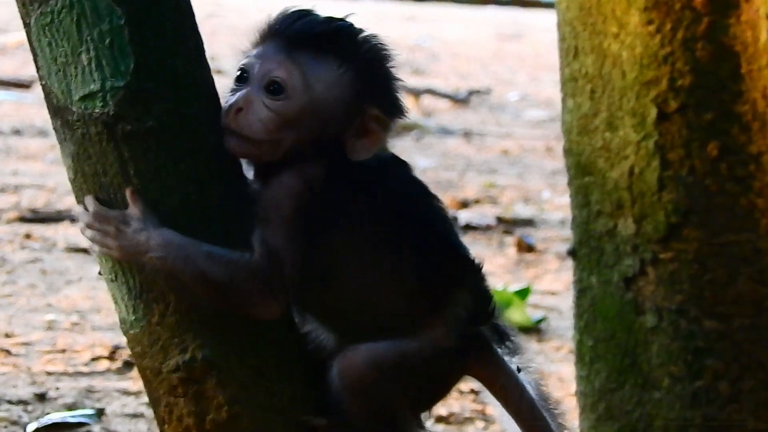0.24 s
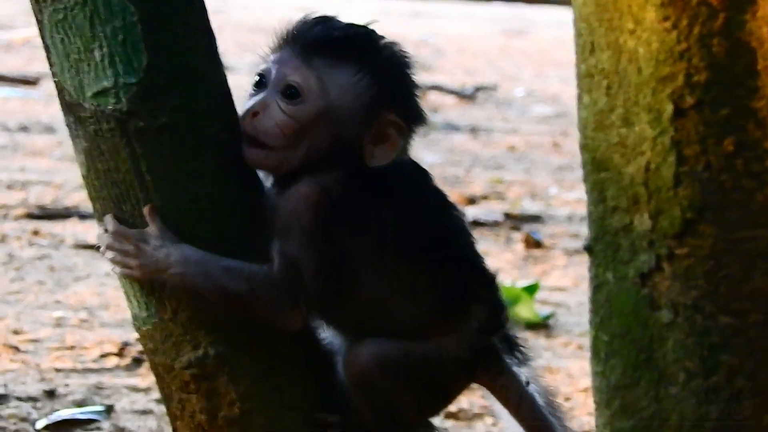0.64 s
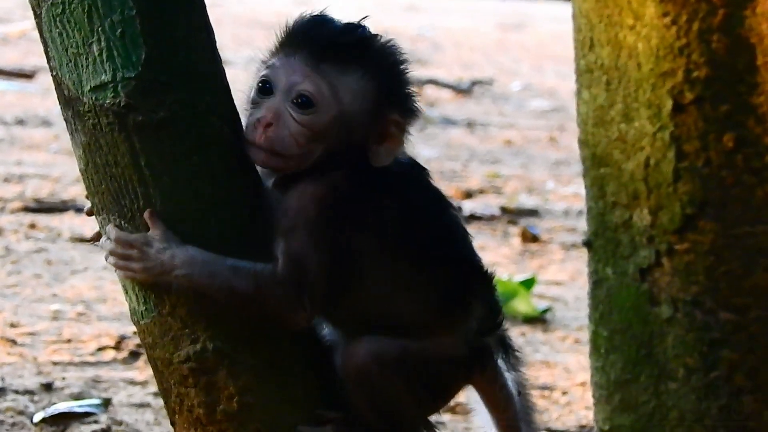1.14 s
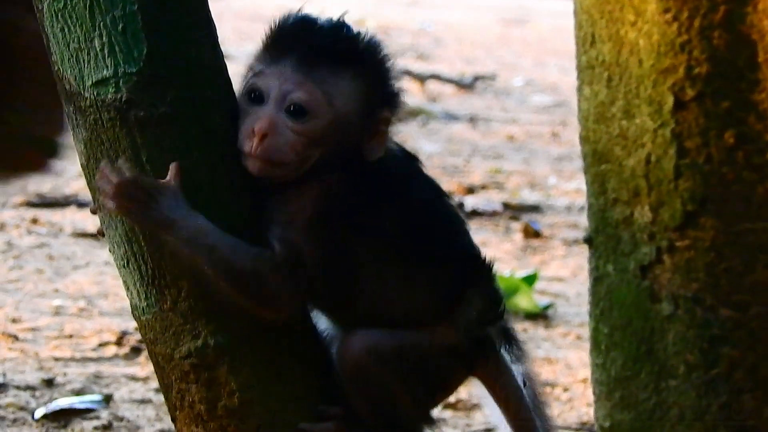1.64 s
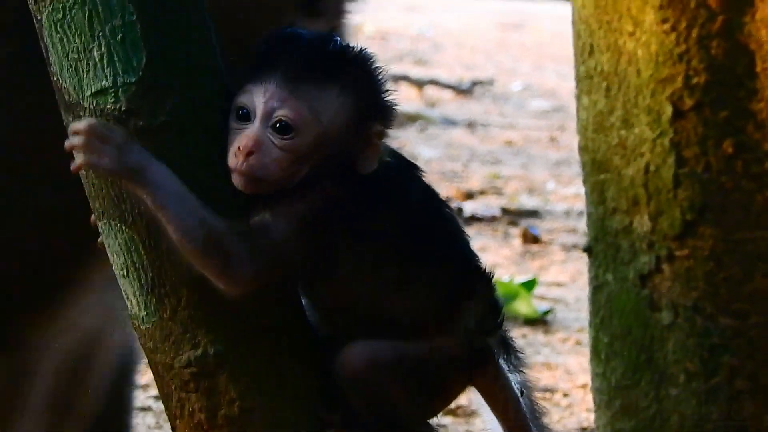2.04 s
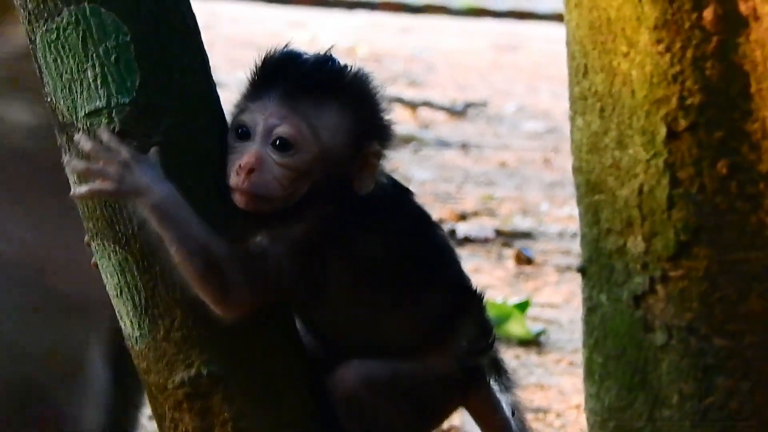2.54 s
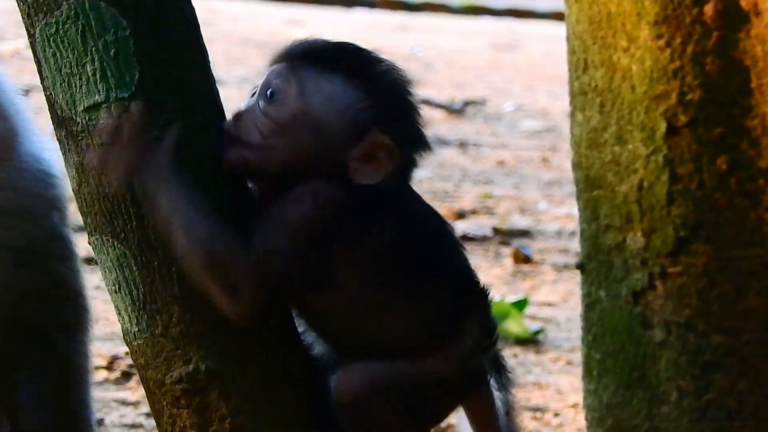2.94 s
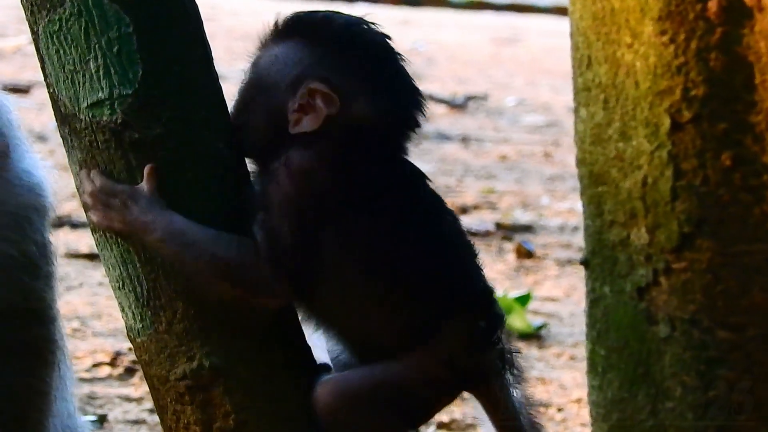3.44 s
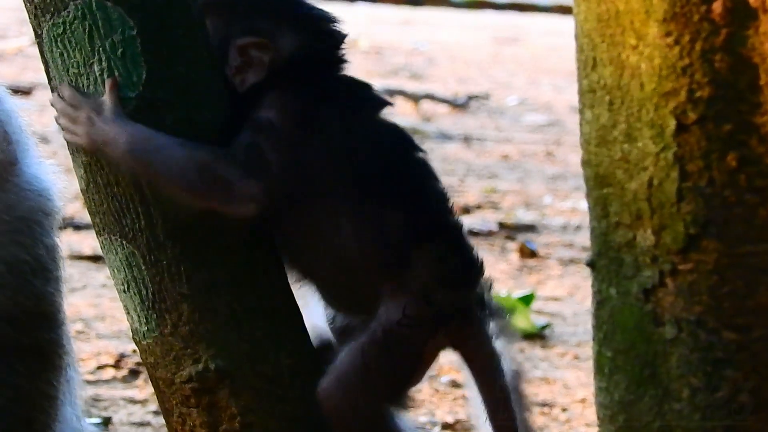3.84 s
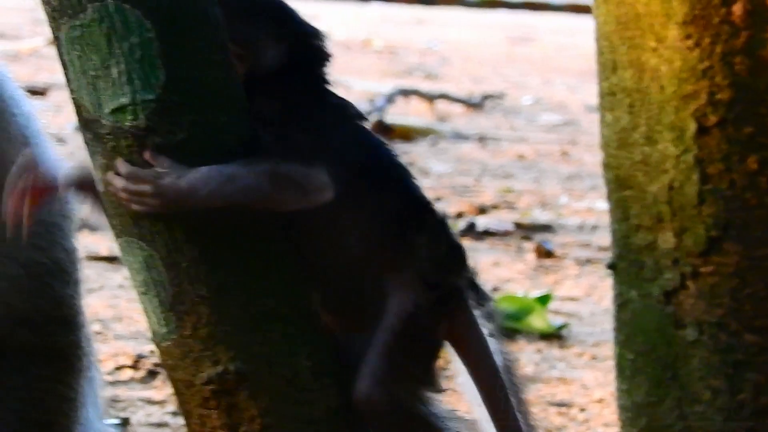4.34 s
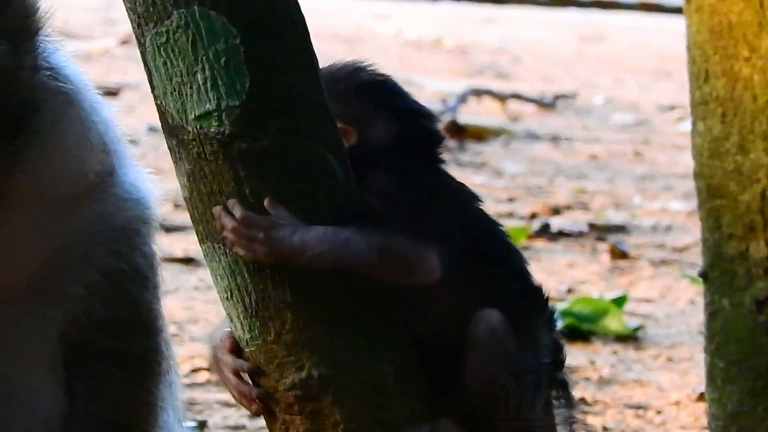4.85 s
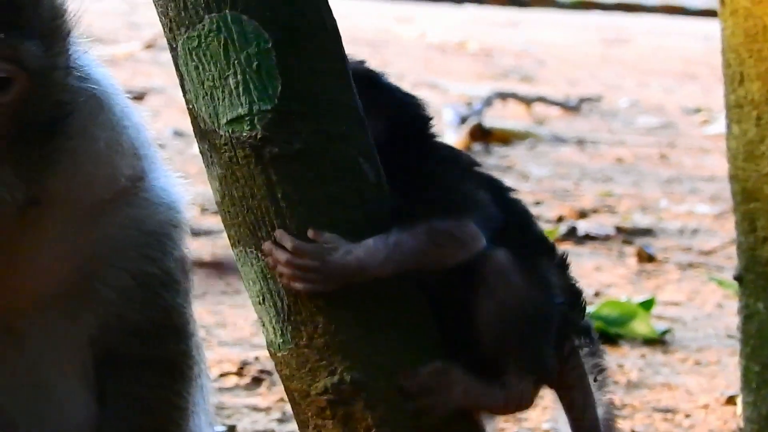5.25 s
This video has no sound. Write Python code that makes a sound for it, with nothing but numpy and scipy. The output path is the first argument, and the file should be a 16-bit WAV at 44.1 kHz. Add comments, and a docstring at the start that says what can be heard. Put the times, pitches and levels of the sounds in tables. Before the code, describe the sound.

A dense, shrill cicada chorus drones outdoors while nearer insects rasp in quick pulses, over faint engine rumble and small rustles and ticks on bark.

```python
"""Cicada chorus with near singers.

A chorus in the trees drones on: random clicks ring body resonances over a blurred noise mass of far singers.
Three near singers, a phrase each, rasp brightly some six times a second while the drone sinks.
Engines hum far away as wavering harmonics over a noise rumble; bark rustles in grains and ticks as
short wooden rings close by."""
import sys
import numpy as np
from scipy import signal
from scipy.fft import rfft, irfft
from scipy.io import wavfile

SR = 44100
rng = np.random.default_rng(int(sys.argv[2]) if len(sys.argv) > 2 else 0)


def waveform_to_disk(signal):
    """Save audio, clipped to [-1, 1], as 16-bit WAV at the path in sys.argv[1]."""
    frames = np.transpose(np.atleast_2d(signal))
    scaled = np.clip(frames, -1, 1) * 32767
    samples = np.round(scaled).astype(np.int16)
    wavfile.write(sys.argv[1], SR, samples)


def how_loud(loudness_db):
    """Turn decibels into a plain amplitude multiplier (0 dB gives 1, 20 dB gives 10)."""
    steps = np.asarray(loudness_db, float) / 20
    return 10 ** steps


N = 242550


def rms_one(x):
    """Scale to rms 1."""
    return x / np.sqrt(np.mean(x ** 2) + 1e-20)


def in_time(rows):
    """Columns of a curve at every sample."""
    s, *columns = np.transpose(rows)
    return [np.interp(np.arange(N) / SR, s, c) for c in columns]


def at_hz(points, hz):
    """Read a spectrum on a log-frequency axis."""
    point_hz, value = np.transpose(points)
    return np.interp(np.log(hz), np.log(point_hz), value)


def panned(db, pan_db):
    """Left and right gains, pan_db apart."""
    return how_loud(np.array([db + pan_db / 2, db - pan_db / 2]))


def drift(rate_hz):
    """Slow random curve of rms 1: noise through two equal low-pass poles at SR / 40."""
    r = np.exp(-80 * np.pi * rate_hz / SR)
    noise = rng.standard_normal(N // 40 + 2002)
    slow = signal.lfilter([1], [1, -2 * r, r * r], noise)[2000:]
    return np.interp(np.arange(N) / 40, np.arange(len(slow)), rms_one(slow))


def stereo(pair, alike):
    """Left and right of a given likeness from two unrelated signals."""
    alike = np.clip(alike, 0, 1)
    middle = np.sqrt((1 + alike) / 2) * pair[0]
    side = np.sqrt((1 - alike) / 2) * pair[1]
    return middle + side * [[1], [-1]]


def ring_twice(x, hz, width_hz):
    """A resonance applied twice keeps its skirts steep; width_hz is that of one pass."""
    r = np.exp(-np.pi * width_hz / SR)
    stage = [1, 0, -1, 1, -2 * r * np.cos(2 * np.pi * hz / SR), r * r]
    return rms_one(signal.sosfilt([stage, stage], x))


def swing(times, depths, half_s):
    """Flat-topped humps of the given depths."""
    t = np.arange(N) / SR
    return sum(depth * np.exp(-np.abs((t - s) / half_s) ** 3) for s, depth in zip(times, depths))


def clicks(per_s, spread_db):
    """Two unrelated streams of random clicks, uneven in size and sign."""
    sizes = how_loud(spread_db * np.minimum(rng.exponential(1, (2, N)), 4))
    signs = rng.choice([-1, 1], (2, N))
    return sizes * signs * (rng.random((2, N)) < per_s / SR)


# Stereo spread of broad noise. Each row: frequency in Hz, left-right likeness (1 = same).
NOISE_LIKENESS = [(60, 1.0), (130, 1.0), (290, 0.99), (640, 0.9), (1410, 0.54), (3100, 0.27), (6820, 0.12),
                  (15000, 0.5)]


def coloured(spectrum, patchy_db):
    """Stereo noise in five overlapping slices, likeness set by frequency, each flickering alone; rms 1."""
    hz = np.maximum(np.arange(N // 2 + 1) * SR / N, 1)
    low_hz, high_hz = spectrum[0][0], spectrum[-1][0]
    pair = rfft(rng.standard_normal((2, N))) * how_loud(at_hz(spectrum, hz))
    pair = pair * (hz > low_hz / 2) * (hz < high_hz * 2)
    both = stereo(pair, at_hz(NOISE_LIKENESS, hz))
    place = np.clip(4 * np.log(hz / low_hz) / np.log(high_hz / low_hz), 0, 4)
    out = 0
    for k in range(5):
        share = np.sqrt(np.clip(1 - np.abs(place - k), 0, 1))
        out = out + irfft(both * share, N) * how_loud(patchy_db * drift(7.5))
    return rms_one(out)


def drone(rings, dip_db, per_s, waver_db, waver_hz=9.6):
    """Many ribs buckling out of step ring the hollow bodies; the drone sinks while the rasp sounds."""
    out = 0
    for hz, width_hz, db, alike, dip_share in rings:
        rung = ring_twice(stereo(clicks(per_s, spread_db=-0.5), alike), hz, width_hz)
        waver = np.array([drift(waver_hz), drift(waver_hz)])
        out = out + rung * how_loud(db + dip_share * dip_db + waver_db * waver)
    return out


# Slow swell of the chorus. Each row: time in seconds, low ring level in dB, main ring level in dB,
# treble level in dB, left over right of the drone in dB.
CHORUS_SWELL = [(0.0, -60, -51.5, -50, -1.5), (0.5, -61.5, -49.5, -49, -1.5),
                (1.0, -60.5, -49, -50.5, -1.5), (1.9, -60, -49, -49.5, -.3), (2.5, -60.5, -48.5, -51, -.6),
                (3.05, -61.5, -47.5, -51.5, -1.5), (3.5, -61.2, -48.5, -51.5, 1.2),
                (4.1, -61, -48, -51.5, 0.5), (4.6, -60.5, -48.5, -50, -3), (5.05, -58.5, -48, -50, -2.5),
                (5.5, -58.5, -47.5, -49.5, -3)]
# Body rings. Each row: frequency in Hz, one-pass width in Hz, relative level in dB,
# left-right likeness, share of the dip.
LOW_RINGS = [(1775, 124, -3.5, 0.52, 0.34), (1861, 454, -3, 0.73, 1.2), (1597, 260, -10, .6, 1)]
MAIN_RINGS = [(3577, 334, -4, 0.31, 2.3), (3438, 670, -1, 0.31, 1.3), (3900, 220, -9.5, 0.56, 2.3),
              (4286, 560, -11.5, 1, 2.4)]
UPPER_BODY_RINGS = [(5200, 740, -8, .15, 0.96), (6700, 560, -14.5, 0.092, 0.11),
                    (8200, 610, -14.5, .2, .01), (11460, 1500, -13.5, 0.2, .01)]
TOP_BODY_RINGS = [(13100, 900, -14.5, 0.33, .01), (14900, 1300, -23, .3, .01)]
# Blurred mass of far singers. Each row: frequency in Hz, relative density in dB per Hz.
FAR_MASS_COLOUR = [(1400, -21.5), (2300, -10.5), (2800, -10), (4700, 1), (6000, -0.5), (7500, -3),
                   (9100, -4.5), (10500, -5), (13000, -2.5), (15000, -5.5), (15900, -6)]
DIP_HALF_S, DIP_LATE_S = 0.03, 0.0079
LOW_PAN_DB, TOP_PAN_DB, MASS_PAN_DB = 0.1, 11, 0.1
UPPER_UNDER_MAIN_DB, MASS_OVER_TREBLE_DB = -1.5, 1.5


def chorus(rows):
    """Clicks drone in four groups of body rings, dipping just after each rasp, over the noise of far singers."""
    low_db, main_db, treble_db, pan_db = in_time(CHORUS_SWELL)
    dip_db = swing(rows[:, 0] + DIP_LATE_S, rows[:, -1], DIP_HALF_S)
    low = rms_one(drone(LOW_RINGS, dip_db, per_s=3000, waver_db=0.4))
    main = rms_one(drone(MAIN_RINGS, dip_db, per_s=4000, waver_db=0.17))
    upper = drone(UPPER_BODY_RINGS, dip_db, per_s=4000, waver_db=0.4, waver_hz=5.8)
    top = drone(TOP_BODY_RINGS, dip_db, per_s=5900, waver_db=0.8, waver_hz=3.5)
    mass = coloured(FAR_MASS_COLOUR, patchy_db=0.98)
    return (panned(low_db, pan_db + LOW_PAN_DB) * low
            + panned(main_db, pan_db) * main
            + panned(main_db + UPPER_UNDER_MAIN_DB, pan_db / 2) * upper
            + panned(treble_db, TOP_PAN_DB) * top
            + panned(treble_db + MASS_OVER_TREBLE_DB, MASS_PAN_DB) * mass)


def engine(curve, orders_db, dulling_db_per_s=0):
    """Multiples of the firing rate, each wavering on its long way through the air."""
    rate_hz, level_db = in_time(curve)
    dull_db = dulling_db_per_s * np.arange(N) / SR
    turn = 2 * np.pi * np.cumsum(rate_hz * (1 + 0.00573 * drift(1.43))) / SR
    out = 0
    for k, db in enumerate(orders_db):
        gain = np.sqrt(2) * how_loud(level_db + db - dull_db * k + 2.2 * drift(4.2))
        out = out + gain * np.sin((k + 1) * turn + 7 * rng.random())
    return out


# Receding engine. Each row: time in seconds, firing rate in Hz, level in dB.
RECEDING_ENGINE = [(0, 35.6, -68), (1.3, 37.13, -68.5), (2.2, 38.33, -73), (3.5, 39.36, -70.5),
                   (4.4, 40.42, -74.5), (4.8, 39.54, -75), (5.5, 40.07, -78)]
# Each entry: relative level in dB of the next multiple of the firing rate.
RECEDING_ORDERS = [-11, -2.3, -2, -4, -9, -9.5, -8.5, -14]


def receding_engine():
    """Each higher multiple loses a further 0.25 dB per second as the engine draws away."""
    return engine(RECEDING_ENGINE, RECEDING_ORDERS, dulling_db_per_s=0.25)


# Sagging engine. Each row: time in seconds, firing rate in Hz, level in dB.
SAGGING_ENGINE = [(0, 50.5, -74.5), (.9, 50.36, -73.5), (1.3, 47.95, -70), (1.7, 42.5, -70), (2.1, 45, -92),
                  (2.6, 50, -76), (3.6, 50.86, -75), (3.95, 46, -81), (5.5, 46.2, -80)]
# Each entry: relative level in dB of the next multiple of the firing rate.
SAGGING_ORDERS = [-8, .1, -6]


def sagging_engine():
    """Three multiples of a firing rate that sags, almost vanishes, returns high and sags again."""
    return engine(SAGGING_ENGINE, SAGGING_ORDERS)


# Traffic rumble. Each row: time in seconds, level in dB.
RUMBLE_LEVEL = [(0.0, -67), (0.45, -67), (1.35, -66.5), (2.17, -69.5), (3.52, -71.5), (3.97, -71),
                (5.06, -66.5), (5.5, -69.5)]
# Each row: frequency in Hz, relative density in dB per Hz.
RUMBLE_SPECTRUM = [(20, -30), (35, -11), (60, 0.5), (107, -2.5), (143, -0.5), (175, -7.5), (344, -10),
                   (600, -12.5), (1200, -34.5), (1600, -14)]


def rumble():
    """Traffic as coloured noise, mostly low, swelling slowly."""
    return how_loud(in_time(RUMBLE_LEVEL)[0]) * coloured(RUMBLE_SPECTRUM, patchy_db=1.0)


# Near singers, one phrase each. Each row: first rasp in seconds, gap in seconds, shortening per gap in
# seconds (negative lengthens), body pitch in Hz, left over right in dB, middle over high rings in dB at the
# first rasp, drone dip in dB at full effort before each ring's share.
NEAR_SINGERS = [(0.145, 0.143, -0.0012, 1520, 3, -7, -0.7), (1.56, 0.1715, 0.00103, 1664, 7, 2, -4.5),
                (3.635, 0.1575, 0.00001, 1530, 0.8, -5.8, -0.8)]
# Each entry: rasps in that singer's phrase.
PHRASE_RASPS = [9, 18, 12]
# Effort, one curve per singer. Each row: time in seconds, level of the high rings in dB.
SINGER_EFFORTS = [
    [(0.1, -61), (0.7, -70), (1.35, -54)],
    [(1.5, -66.5), (2.1, -58), (2.6, -54.5), (2.9, -55.5), (3.3, -55.5), (3.7, -55), (4.0, -53.5),
     (4.35, -57)],
    [(3.6, -73), (4.1, -59), (4.6, -52.5), (5.0, -53), (5.4, -50)],
]
FULL_EFFORT_DB, DIP_EXPONENT = -53, 2.23   # a weaker rasp pulls the drone down less
MIDDLE_LOSS_DB_PER_RASP = 0.23


def rasp_rows():
    """Slowly changing pace: rows of s, body Hz, middle dB, high dB, left over right dB, dip dB."""
    rows = []
    for singer, count, effort in zip(NEAR_SINGERS, PHRASE_RASPS, SINGER_EFFORTS):
        first_s, gap_s, quicker_s, body_hz, pan_db, middle_db, full_dip_db = singer
        for k in range(count):
            s = first_s + gap_s * k - quicker_s * k * (k - 1) / 2
            high_db = np.interp(s, *np.transpose(effort))
            rasp_middle_db = high_db + middle_db - MIDDLE_LOSS_DB_PER_RASP * k
            dip_db = full_dip_db * how_loud(DIP_EXPONENT * (high_db - FULL_EFFORT_DB))
            rows.append((s, body_hz, rasp_middle_db, high_db, pan_db, dip_db))
    return np.array(rows)


# Strength of a rasp ring by its pitch. Each row: frequency in Hz, relative level in dB.
RASP_RING_COLOUR = [(6000, -8), (6700, -13), (7700, 0), (8300, -3.5), (9200, -0.5), (10000, -7),
                    (11600, -15), (12400, -2), (13300, -1.5), (13900, 1), (15000, -4), (15500, -4),
                    (16600, -20)]
RASP_HALF_S, RASP_SPLIT_HZ, RASP_LIKENESS = 0.027, 11000, 0.66
RASP_WIDTH_SHARE, RASP_PITCH_SPREAD = 0.085, 0.012   # shares of ring pitch
MIDDLE_PAN_SHARE = 0.38   # the duller rings spread round and are heard nearer the centre


def rasps(rows):
    """With the abdomen raised the clicks ring short and bright, on multiples of the singer's body pitch."""
    out = np.zeros((2, N))
    size = int(0.16 * SR)
    stream = stereo(clicks(2300, spread_db=1.5), RASP_LIKENESS)
    hump = np.exp(-np.abs((np.arange(size) - size / 2) / SR / RASP_HALF_S) ** 3)
    chance = rng.standard_normal((len(rows), 8))
    for (s, body_hz, middle_db, high_db, pan_db, _), (stray, *uneven) in zip(rows, chance):
        at = int(s * SR) - size // 2
        span = slice(at, at + size)
        for k in range(7):   # multiples four to ten
            hz = (k + 4) * body_hz * (1 + RASP_PITCH_SPREAD * stray)
            middle = hz < RASP_SPLIT_HZ
            db = at_hz(RASP_RING_COLOUR, hz) + (middle_db if middle else high_db) + 0.68 * uneven[k]
            gains = panned(db, pan_db * (MIDDLE_PAN_SHARE if middle else 1))
            rung = ring_twice(stream[:, span], hz, RASP_WIDTH_SHARE * hz)
            out[:, span] += gains[:, None] * hump * rung
    return out


# Grain rings of bark. Each row: frequency in Hz, one-pass width in Hz, relative level in dB,
# left-right likeness.
BARK_RINGS = [(580, 880, 0.5, 1), (1054, 1460, -0.2, 0.94), (2120, 940, -1.5, 0.7)]
# Brushes against the bark. Each row: start in seconds, hold in seconds, level in dB.
BARK_BRUSHES = [(0.43, 0.044, -70), (0.55, 0.35, -72.5), (1.17, 0.05, -72), (1.35, 0.049, -72.5),
                (1.53, 0.06, -70.5), (1.87, 0.021, -70.5), (2.07, 0.18, -74), (2.31, 0.014, -68.5),
                (2.69, 0.018, -63), (2.78, 0.087, -66.5), (3.34, 0.071, -72.5), (3.46, 0.04, -65),
                (3.57, 0.21, -74.5), (4.01, 0.07, -70), (4.16, 0.11, -70.5), (4.78, 0.043, -68),
                (4.89, 0.077, -66)]
BRUSH_RISE_DB_PER_S, BRUSH_FALL_DB_PER_S, QUIET_RUSTLE_DB = 325, 140, -80


def rustle():
    """Fur and fingers on bark: flickering grains in broad dull rings; each brush rises fast, holds and fades."""
    grains = 0
    for hz, width_hz, db, alike in BARK_RINGS:
        stream = stereo(clicks(1500, spread_db=0.5), alike)
        grains = grains + how_loud(db) * ring_twice(stream, hz, width_hz)
    t = np.arange(N) / SR
    level = how_loud(QUIET_RUSTLE_DB)
    for s, held_s, db in BARK_BRUSHES:
        rise_db = BRUSH_RISE_DB_PER_S * (s - t)
        fall_db = BRUSH_FALL_DB_PER_S * (t - s - held_s)
        lost_db = np.maximum(np.maximum(rise_db, fall_db), 0)
        level = np.hypot(level, how_loud(db - lost_db))
    return level * how_loud(1.72 * drift(31.0)) * rms_one(grains)


# Ticks on bark. Each row: start in seconds, blow level in dB before onset and decay, frequency in Hz,
# left over right in dB.
BARK_TICKS = [(0.6247, -39, 696, 2), (0.8595, -52, 754, 0.1), (2.2065, -48, 353, -1.1),
              (2.7015, -54, 689, 0.4), (2.8535, -51, 1180, 1.1), (3.4635, -45, 1340, 0.1),
              (3.4935, -52, 920, 2), (4.2595, -41.5, 1210, 2), (4.3295, -51, 851, 0.4),
              (5.1465, -48, 703, -0.4)]
TICK_T60_S, OVERTONE_EXTRA_T60_S, TICK_LOAD_S = 0.01, 0.0056, 0.0005


def ticks():
    """Each tick is a short, dull wooden ring with a faster-fading overtone."""
    out = np.zeros((2, N))
    t = np.arange(int(0.06 * SR)) / SR
    for s, db, hz, pan_db in BARK_TICKS:
        overtone = 0.61 * np.sin(2 * np.pi * 1.36 * hz * t) * how_loud(-60 * t / OVERTONE_EXTRA_T60_S)
        ring = np.sin(2 * np.pi * hz * t) + overtone
        ring = ring * (1 - np.exp(-t / TICK_LOAD_S))   # a soft fingertip takes a moment to load the wood
        at = int(s * SR)
        out[:, at:at + len(t)] += panned(db, pan_db)[:, None] * ring * how_loud(-60 * t / TICK_T60_S)
    return out


# Late engine. Each row: time in seconds, firing rate in Hz, level in dB.
LATE_ENGINE_CURVE = [(4.2, 40.5, -86.5), (4.45, 39.7, -74), (4.85, 32.4, -73.5), (5.1, 32.65, -74),
                     (5.5, 29.4, -71.5)]
# Each entry: relative level in dB of the next multiple of the firing rate.
LATE_ENGINE_ORDERS = [-31, 0, -3, -0.5]


def late_engine():
    """Multiples of a falling firing rate; very faint until it swells after 4.2 s."""
    return engine(LATE_ENGINE_CURVE, LATE_ENGINE_ORDERS)


def scene():
    """All sources in the open air."""
    rows = rasp_rows()
    cicadas = chorus(rows) + rasps(rows)
    engines = receding_engine() + sagging_engine() + late_engine()
    return cicadas + engines + rumble() + rustle() + ticks()


def band_limit(x):
    """A steep low-pass at the top of the band."""
    return signal.sosfilt(signal.butter(12, 16030, fs=SR, output="sos"), x)


LEFT_LATE_S, CUTOFF_HZ = 1.1e-5, 15760


def record(dry):
    """Sound reaches the left port a little late; the top is cut off sharply."""
    hz = np.arange(N // 2 + 1) * SR / N
    delay = np.exp(-2j * np.pi * hz * [[LEFT_LATE_S], [0]])
    ports = rfft(dry) * delay * (hz < CUTOFF_HZ)
    return band_limit(irfft(ports, N))


dry = scene()
out = record(dry)
waveform_to_disk(out)
```